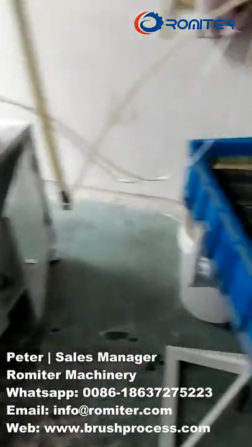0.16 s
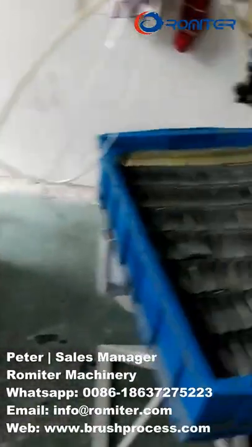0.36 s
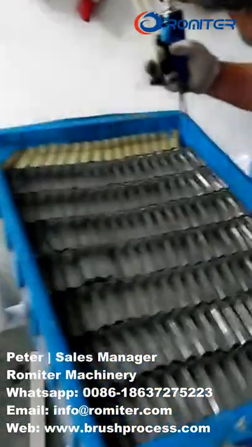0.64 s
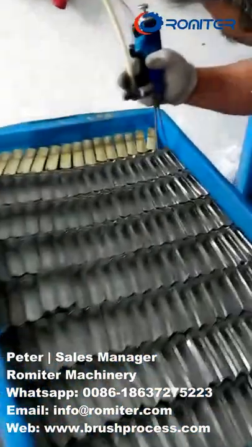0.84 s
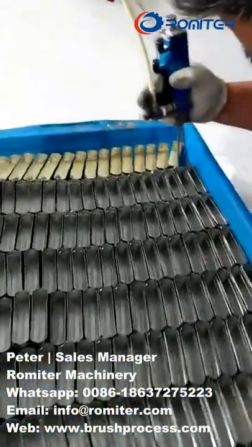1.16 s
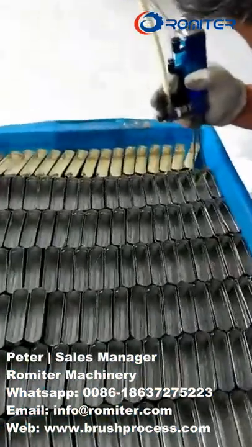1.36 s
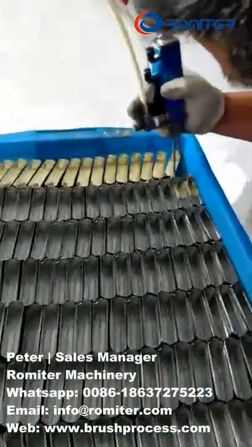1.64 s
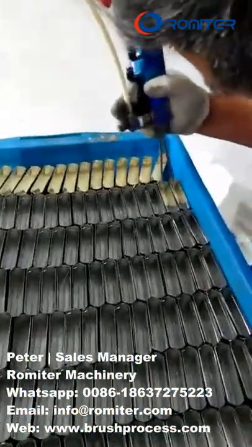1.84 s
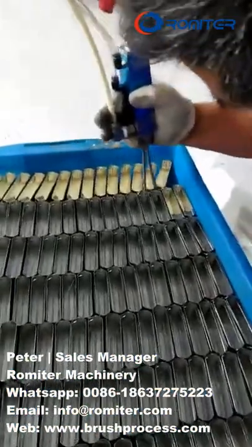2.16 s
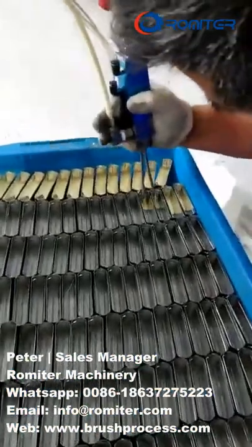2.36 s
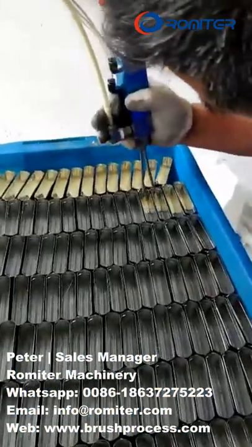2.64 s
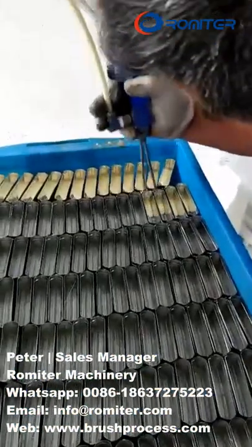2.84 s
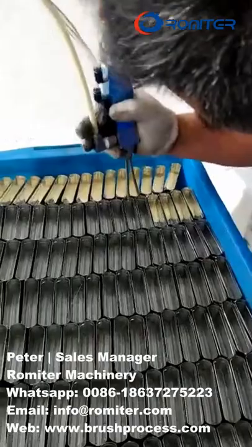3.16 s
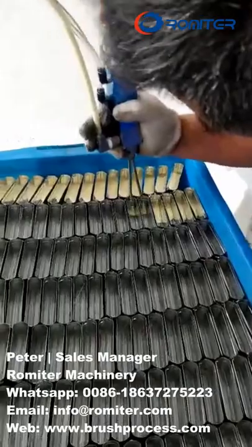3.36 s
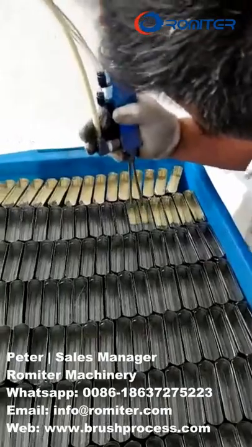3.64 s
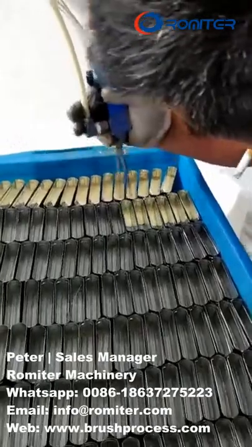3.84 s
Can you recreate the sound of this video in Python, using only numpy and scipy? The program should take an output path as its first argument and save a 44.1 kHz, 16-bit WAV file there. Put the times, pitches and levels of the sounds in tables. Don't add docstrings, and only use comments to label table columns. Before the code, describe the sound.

Pneumatic dispenser fires sharp air puffs and hisses about once a second over dull motor hum

```python
import sys
import numpy as np
from scipy import signal
from scipy.fft import rfft, irfft
from scipy.io import wavfile
from scipy.ndimage import uniform_filter1d

SR = 44100
rng = np.random.default_rng(int(sys.argv[2]) if len(sys.argv) > 2 else 0)


def wrap_up_sound(samples):
    columns = np.atleast_2d(samples).T
    tamed = np.clip(columns, -1, 1)
    steps = np.round(tamed * 32767).astype(np.int16)
    wavfile.write(sys.argv[1], SR, steps)


def gain_from_db(level_db):
    decades = np.asarray(level_db, float) / 20
    return 10 ** decades


N = 176400
T = np.arange(N) / SR


def at_hz(points, hz):
    points = np.array(points)
    return np.interp(np.log(hz), np.log(points[:, 0]), points[:, 1])


def bin_hz(size):
    return np.maximum(np.fft.rfftfreq(size, 1 / SR), 1)


def rms_one(x):
    return x / np.sqrt(np.mean(x ** 2) + 1e-20)


def drift(rate):
    r = np.exp(-80 * np.pi * rate / SR)
    slow = signal.lfilter([1], [1, -2 * r, r * r], rng.standard_normal(N // 40 + 2002))[2000:]
    return np.interp(np.arange(N) / 40, np.arange(len(slow)), rms_one(slow))


def coloured(spectrum, size=N):
    noise = rfft(rng.standard_normal(size))
    return rms_one(irfft(noise * gain_from_db(at_hz(spectrum, bin_hz(size))), size))


EDGES = 60 * 2 ** np.arange(0, 8.5, .5)


def bands(x):
    log_hz, whole = np.log(bin_hz(len(x))), rfft(x)
    for k, centre in enumerate(EDGES):
        share = np.interp(log_hz, np.log(EDGES), np.arange(len(EDGES)) == k)
        yield centre, irfft(whole * share, len(x))


def resonate(x, peaks):
    out = 0
    for k, (hz, width, level_db) in enumerate(peaks):
        r = np.exp(-np.pi * width / SR)
        zeros = [(1 - r * r) / 2, 0, (r * r - 1) / 2]
        poles = [1, -2 * r * np.cos(2 * np.pi * hz / SR), r * r]
        out = out + (-1) ** k * gain_from_db(level_db) / np.sqrt(width) * signal.lfilter(zeros, poles, x)
    return out


def driven(peaks, shape, lag_hz):
    evenness = .7
    ring = resonate(rng.standard_normal(N), peaks)
    ring = rms_one(ring / uniform_filter1d(ring ** 2, size=900) ** (evenness / 2))
    r = np.exp(-2 * np.pi * lag_hz / SR)
    return ring * signal.lfilter([1 - r], [1, -r], shape)


def puff_shape(times, levels_db, hold, fall):
    rise_s, lead_s, lead_db = 0.001, 0.0064, -9
    out = np.zeros(N)
    for s, level_db, tau in zip(times, levels_db, fall + 0 * times):
        on = slice(int((s - .1) * SR), int((s + .4) * SR))
        t = T[on] - s
        swell = gain_from_db(lead_db) * np.exp(np.minimum(t, 0) / lead_s) / (1 + np.exp(t / rise_s * 2))
        opening = 1 / (1 + np.exp(-t / rise_s * 2)) + swell
        out[on] += gain_from_db(level_db) * opening * np.exp(-np.maximum(t - hold, 0) / tau)
    return out


# pitch_hz, width_hz, level_db
OUTLET = [(2684, 860, -3.5), (3330, 100, 3), (3700, 900, -1.5), (4670, 370, 0), (5020, 1000, 2.5),
          (6250, 445, 4)]


def through_outlet(air, outlet_db, rate):
    rings = 0
    for k, peak in enumerate(OUTLET):
        wander = gain_from_db(2.5 * drift(rate))
        rings = rings + wander * resonate(air, [peak]) * (-1) ** k
    return rms_one(air + gain_from_db(outlet_db) * rms_one(rings))


# pitch_hz, level_db
SHOP = [(40, -44), (90, -19.5), (420, -10), (520, -11.5), (1050, -12.5), (1400, -21.5), (3900, -24),
        (14000, -48)]
# pitch_hz, width_hz, level_db, wander_db, fading_db_per_s
HUM = (254.5, 16, -57.5, 0.5, 1.93)


def shop():
    hz, width, db, wander_db, fading_db = HUM
    hum = resonate(rng.standard_normal(N), [(hz, width, 0)])
    hum = rms_one(resonate(hum, [(hz, 2 * width, 0)]))
    rumble = gain_from_db(-57.5 + 1.2 * drift(3.0)) * coloured(SHOP)
    return rumble + gain_from_db(db + wander_db * drift(2.0) - fading_db * T) * hum


# pitch_hz, t60_s
ROOM_T60 = [(100, .25), (500, .3), (1200, .42), (4000, .5), (12000, .3)]


def room(x):
    t = np.arange(SR) / SR
    tail = 0
    for hz, band in bands(rng.standard_normal(SR)):
        t60 = at_hz(ROOM_T60, hz)
        tail = tail + band * gain_from_db(-60 * t / t60) * np.sqrt(2 * np.log(1000) / t60 / SR)
    return signal.fftconvolve(x, tail * np.clip(t / 0.013, 0, 1))[:N]


# start_s, level_db, pitch_hz, width_hz, decay_s
LATCH = (1.226, -49, 3850, 350, .007)


def latch():
    s, db, hz, width, decay = LATCH
    burst = rng.standard_normal(N) * (T > s) * np.exp(-np.maximum(T - s, 0) / decay)
    ring = resonate(burst, [(hz, width, 0), (5100, 900, -3)])
    return gain_from_db(db) * (ring / np.abs(ring).max() * 3 + .3 * burst)


# start_s, body_db, cylinder_db, hose_db, decay_s
KNOCKS = [
    (0.681, -46.5, -62.5, -53, 0.07),
    (0.851, -47.5, -46.5, -67.5, 0.067),
    (2.141, -44.5, -54, -49.5, 0.044),
    (3.12, -46, -59.5, -48, 0.048),
]
# pitch_hz, level_db (per Hz)
BODY = [(200, -29), (400, -6), (900, 7), (1500, 4), (2500, 12), (4000, -35), (9000, -15), (14000, -26)]
# pitch_hz, width_hz, level_db
HOUSING = [(407, 39, 3.5), (499, 180, -3.5), (306, 70, -11)]
# pitch_hz, width_hz, level_db
HOSE = [(689, 50, 0), (966, 45, -1), (790, 120, -6), (600, 90, -7), (1070, 90, -7)]


def knocks():
    s, body_db, cylinder_db, hose_db, decay = np.transpose(KNOCKS)
    return (coloured(BODY) * puff_shape(s, body_db, .015, decay)
            + driven(HOUSING, puff_shape(s, cylinder_db, 0.038, decay), lag_hz=40)
            + driven(HOSE, puff_shape(s, hose_db, 0.024, decay), lag_hz=40))


# start_s, end_s, level_db, sag_db_per_s
FILLS = [
    (.36, .69, -42.5, 10),
    (.69, .87, -43.5, 10),
    (1.82, 2.145, -43, -0.5),
    (2.145, 2.3, -43, 12),
    (2.8, 3.12, -44, 4.5),
    (3.12, 3.28, -43.5, 6),
    (3.77, 4.1, -43.5, 4),
]
# start_s, end_s, level_db, fall_db_per_s
VENTS = [
    (-.2, .33, -35.5, 19),
    (.86, 1.26, -47, 73),
    (1.28, 1.5, -30.5, 76),
    (1.38, 1.8, -39, 8.5),
    (2.31, 2.79, -36.5, 18.5),
    (3.29, 3.76, -38.5, 17.5),
]
# pitch_hz, level_db
FLOW = [(350, -40), (700, -15), (1500, -11), (2600, -3.5), (5300, -2.5), (6650, -3), (7100, -9),
        (11500, -13), (14000, -8.5)][1:]
# pitch_hz, width_hz, level_db
NOZZLE = [(2860, 37, -23), (3704, 240, -35.5), (4450, 210, 19.5), (5430, 30, -9.5), (6220, 31, 24.5),
          (7400, 120, -23), (8000, 81, 9)]


def flow():
    air = coloured([(350, -16)] + FLOW)
    air = rms_one(air + gain_from_db(-5.5) * rms_one(resonate(air, NOZZLE)))
    air = through_outlet(air, -6, 2.5)
    strokes = ((FILLS, .6, 0), (VENTS, 0.17, 27))
    flutter_db = 1.0
    out, shared, steps = np.zeros(N), drift(10.0), T[::40]
    for hz, band in bands(air):
        bright, power = np.log2(hz / 4000), 0
        for rows, dulling, bend in strokes:
            start, end, db, fall = np.transpose(rows)[:, :, None]
            t = np.clip(steps - start, 0, 1)
            level_db = db - fall * t * max(1 + dulling * bright, .2) - bend * max(bright, 0) * t ** 2
            flowing = (steps >= start) * (steps < end)
            power = power + np.sum(gain_from_db(2 * level_db) * flowing, axis=0)
        gain = np.interp(T, steps, uniform_filter1d(np.sqrt(power), size=8))
        out += band * gain * gain_from_db(flutter_db * (0.88 * shared + drift(6.1)))
    return out


# start_s, jet_db, thump_db, cylinder_db, hose_db
PUFFS = [
    (0.347, -33.5, -44, -37.5, -35),
    (1.274, -28.5, -43, -39.5, -47),
    (1.808, -30.5, -45, -30.5, -33),
    (2.297, -32.5, -39, -35, -40.5),
    (2.786, -30.5, -46.5, -35, -32),
    (3.276, -30, -38, -34.5, -46),
    (3.763, -33, -47, -36, -33),
]
# start_s, level_db
SEEPS = [
    (.324, -41),
    (1.261, -40),
    (1.786, -39),
    (2.283, -45),
    (2.765, -41),
    (3.262, -43),
    (3.739, -42),
]
# pitch_hz, level_db
JET = [(900, -14), (1500, -12), (2200, -3), (3900, -5), (6300, -6.5), (7500, -4.5), (11000, -17.5),
       (14000, -12.5)]
# pitch_hz, level_db (per Hz)
SEEP = [(300, -14), (700, 2), (1500, -3.5), (3000, -1.5), (6500, -1.5), (8000, -8), (14000, -4.5)]
# pitch_hz, width_hz, level_db
SPOOL = [(2760, 170, 0), (4020, 270, 1), (6400, 250, 1)]
# pitch_hz, width_hz, level_db
THUMP = [(134, 35, 0), (102, 25, -6), (212, 40, -8)]
# pitch_hz, width_hz, level_db
CYLINDER = [(406, 24, 0), (340, 80, -9), (470, 50, -8)]


def puffs():
    s, jet_db, thump_db, cylinder_db, hose_db = np.transpose(PUFFS)
    air = through_outlet(coloured(JET), -2, 4.6)
    jet = sum(band * gain_from_db(1.5 * drift(20.0)) for hz, band in bands(air) if hz > 900)
    seep = puff_shape(*np.transpose(SEEPS), 0.015, 0.024)
    return (jet * puff_shape(s, jet_db, 0.02, 0.031)
            + coloured(SEEP) * seep
            + driven(SPOOL, puff_shape(s, hose_db - 2, 0.022, 0.019), lag_hz=60)
            + driven(THUMP, puff_shape(s - .002, thump_db, 0.024, 0.0054), lag_hz=25)
            + driven(CYLINDER, puff_shape(s - 0.0037, cylinder_db, 0.026, 0.019), lag_hz=15)
            + driven(HOSE, puff_shape(s - .008, hose_db, 0.017, 0.013), lag_hz=31.4))


# pitch_hz, side_below_mid_db
WIDTH = [(50, -10), (300, -23.5), (4000, -18.5), (7000, -16.5), (9500, 0.5), (12000, -15)]


def scene():
    dry = puffs() + knocks() + flow() + latch()
    mid = dry + gain_from_db(-4.5) * room(dry) + shop()
    near = np.exp(-np.arange(600) / 370.0) * rng.standard_normal(600)
    side = signal.fftconvolve(np.roll(mid, 200), near / np.sqrt(np.sum(near ** 2)))[:N]
    side = irfft(rfft(side) * gain_from_db(at_hz(WIDTH, bin_hz(N))), N)
    return np.array([mid + side, mid - side])


def band_limit(x):
    return signal.sosfilt(signal.butter(12, 15250, fs=SR, output="sos"), x)


def record(dry):
    high_pass = signal.butter(3, 88, "high", fs=SR, output="sos")
    x = signal.sosfilt(high_pass, dry) + gain_from_db(-23.5) * dry
    mid_side = [(x[0] + x[1]) / 2, (x[0] - x[1]) / 2]
    hz, s, (mid, side) = signal.stft(mid_side, SR, nperseg=2048)
    level_db = 10 * np.log10(2 * np.sum(np.abs(mid) ** 2, axis=0) / 1.5 + 1e-12)

    patch_hz = 520
    patch = (hz / patch_hz).astype(int)
    luck = rng.random((2, 3 * patch[-1] + 3, len(s)))
    wide_from_db, wide_range_db = -35, 2.5
    kept = luck[0, patch] < .7 / (1 + np.exp(-(level_db - wide_from_db) / wide_range_db * 2))

    treble = ((hz > 8400) & (hz < 13000))[:, None]
    fine_patch = (3 * hz / patch_hz).astype(int)
    hole_luck = luck[1, fine_patch][:, np.arange(len(s)) // 2]
    hole_share = .05 * (1 + 2 * (np.abs(hz - 11500) < 900))[:, None]
    holes = treble * ((hole_luck < hole_share) | (kept * luck[0, patch] > .5))
    patched = [mid * gain_from_db(-18 * holes), side * kept]
    mid, side = signal.istft(patched, SR, nperseg=2048)[1][:, :N]

    top_cut = signal.ellip(12, .5, 75, 13980, fs=SR, output="sos")
    mix = signal.sosfilt(top_cut, [.98 * (mid + side), mid - side])
    return band_limit(mix)


dry = scene()
out = record(dry)
wrap_up_sound(out)
```